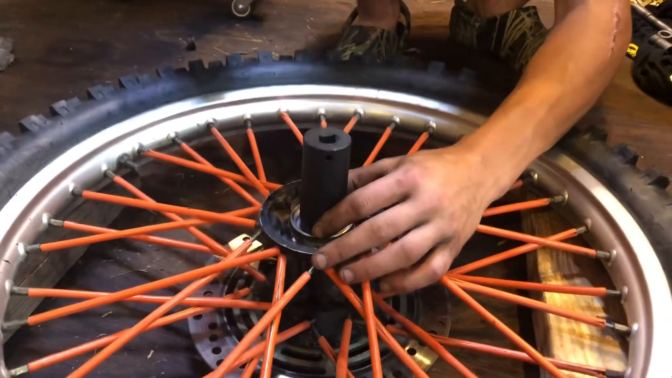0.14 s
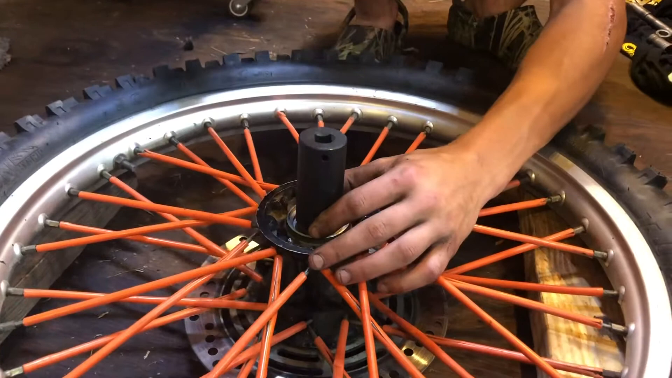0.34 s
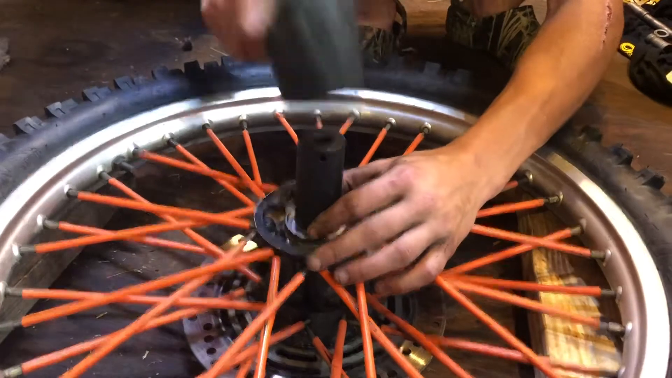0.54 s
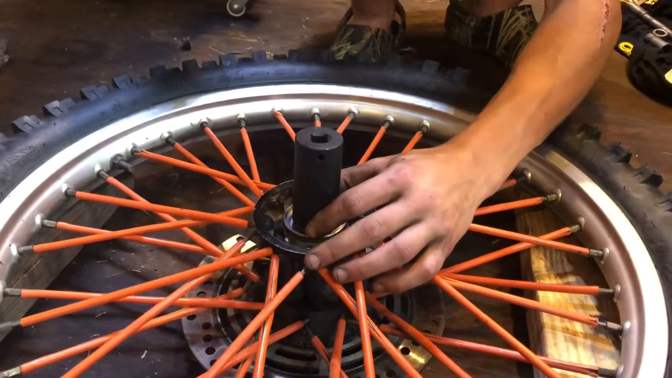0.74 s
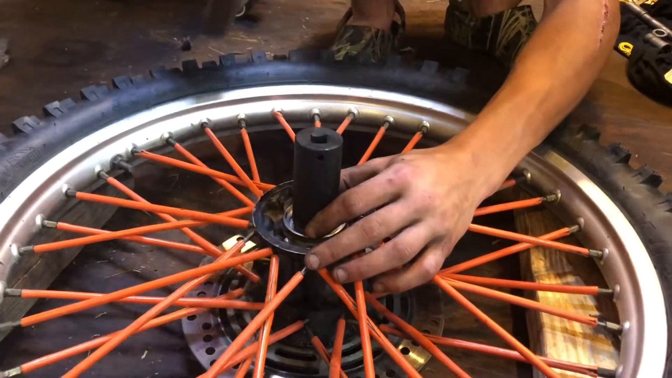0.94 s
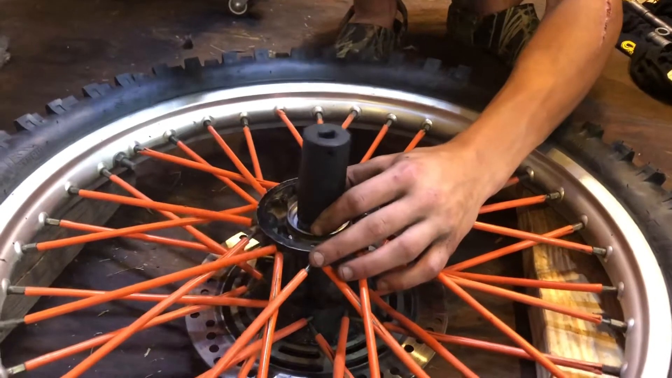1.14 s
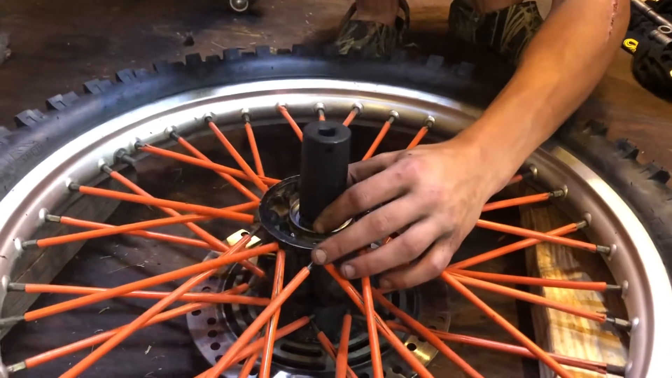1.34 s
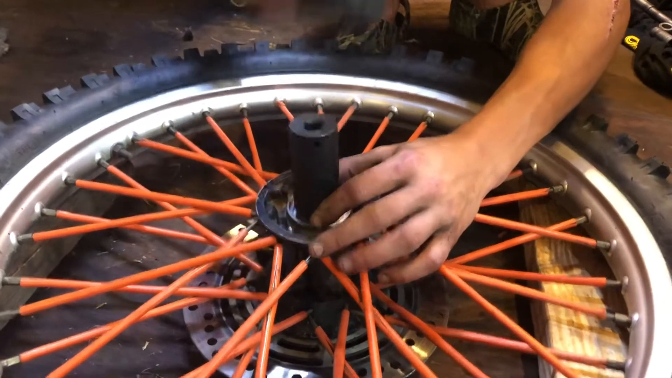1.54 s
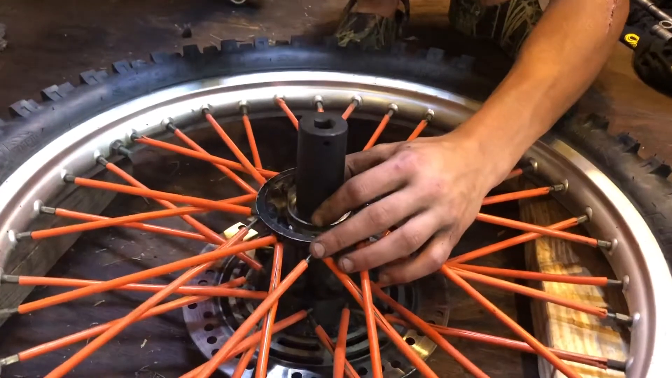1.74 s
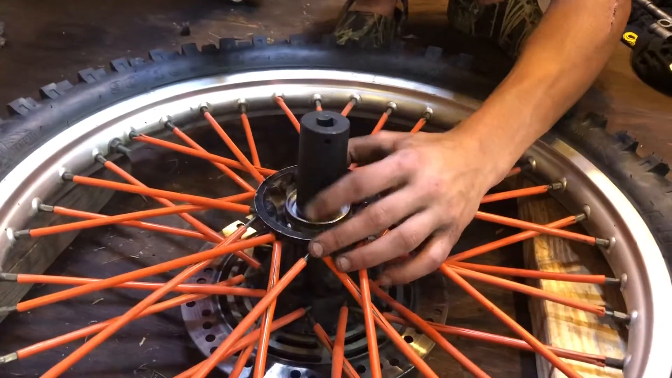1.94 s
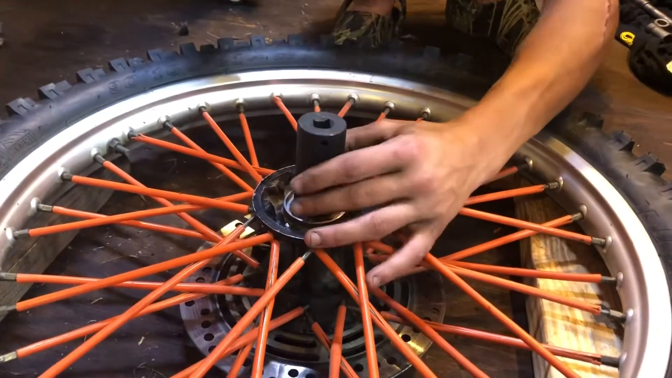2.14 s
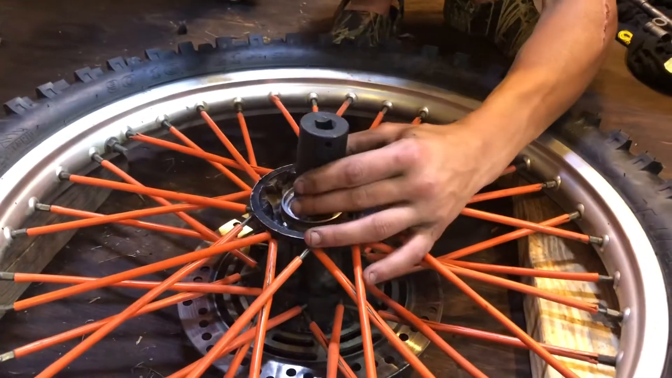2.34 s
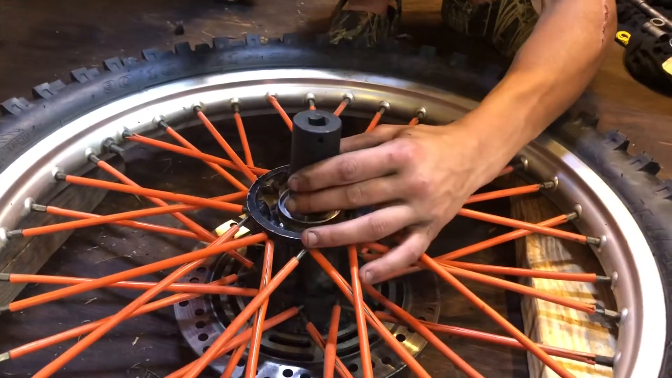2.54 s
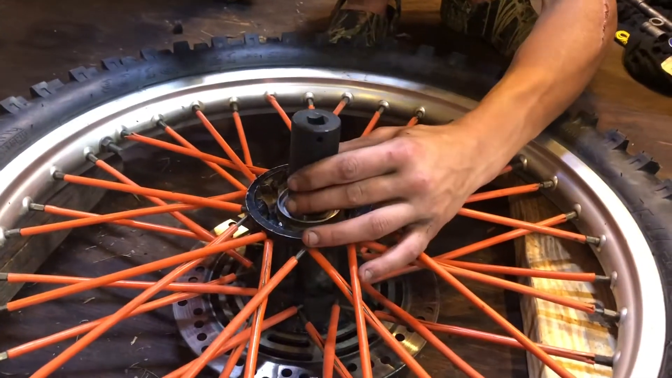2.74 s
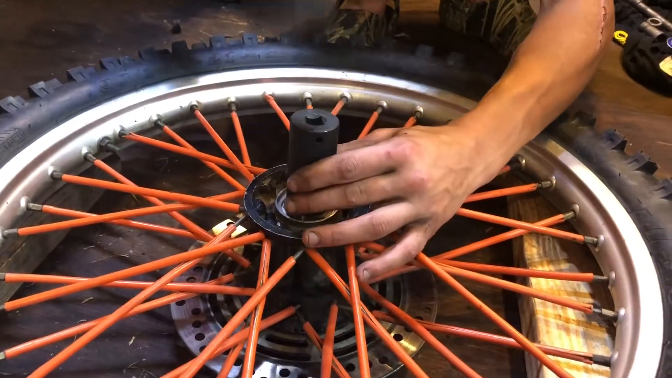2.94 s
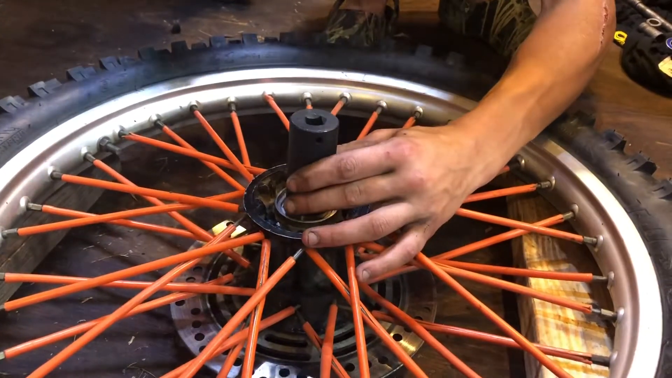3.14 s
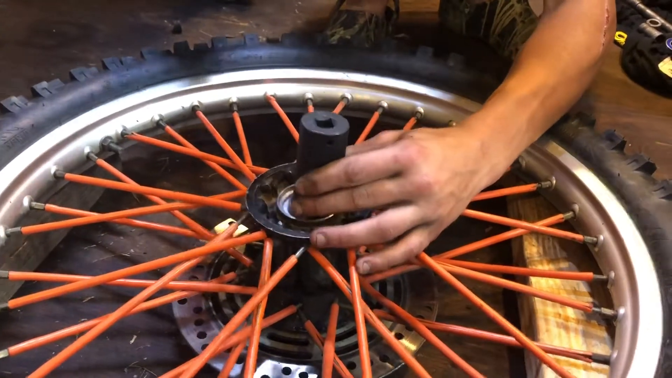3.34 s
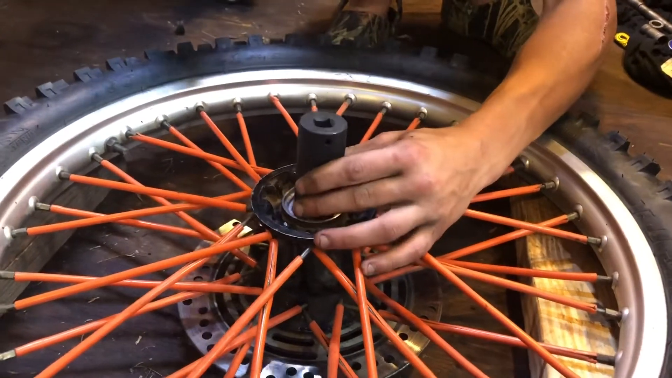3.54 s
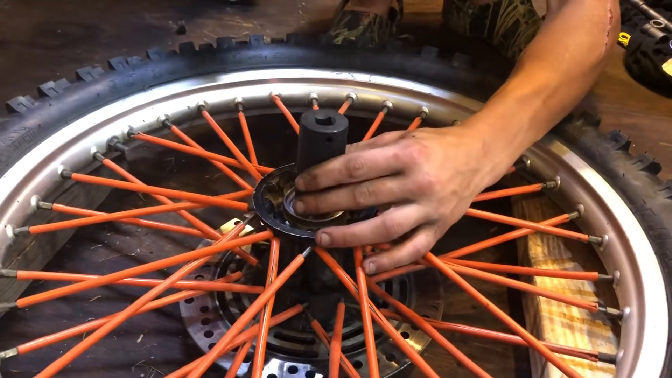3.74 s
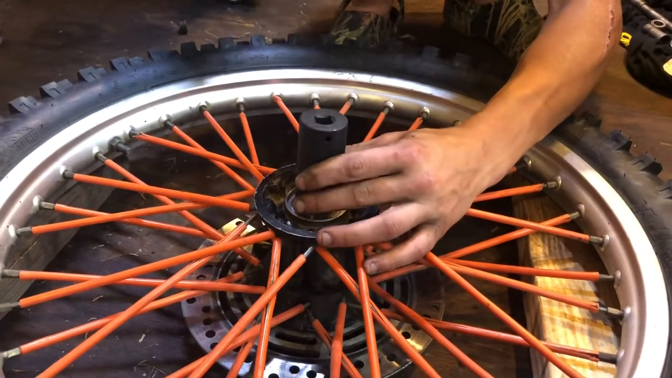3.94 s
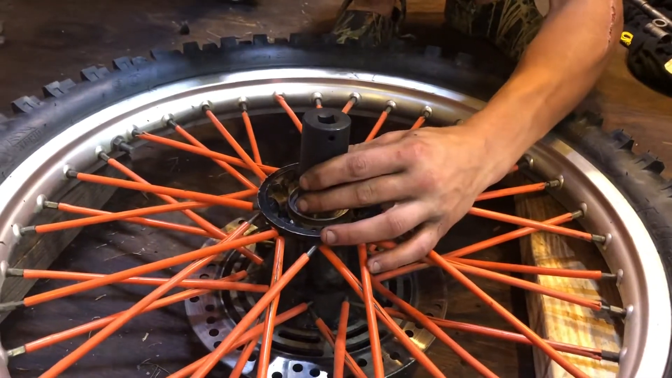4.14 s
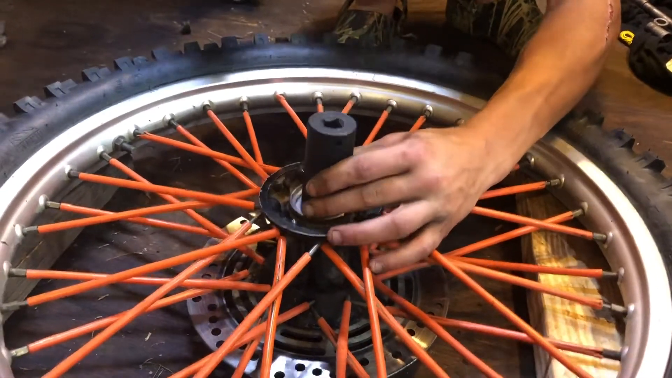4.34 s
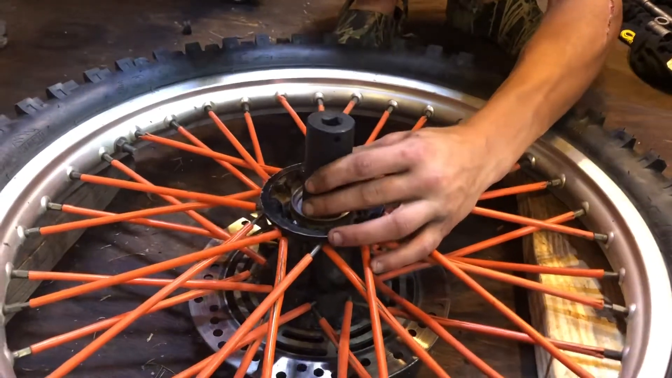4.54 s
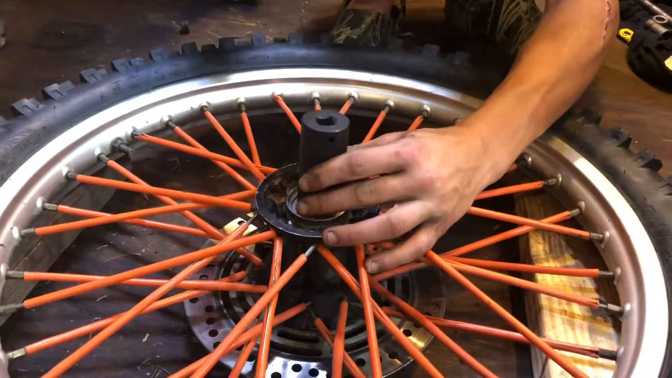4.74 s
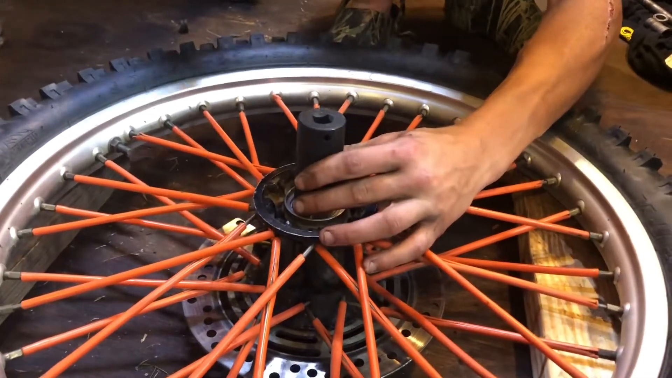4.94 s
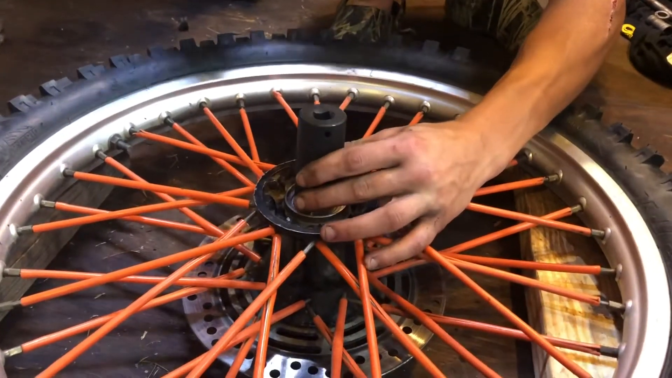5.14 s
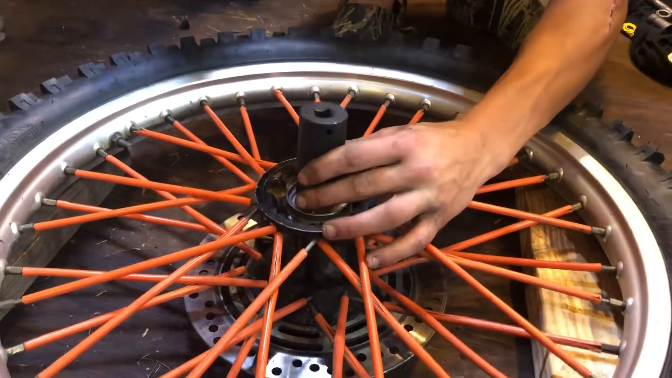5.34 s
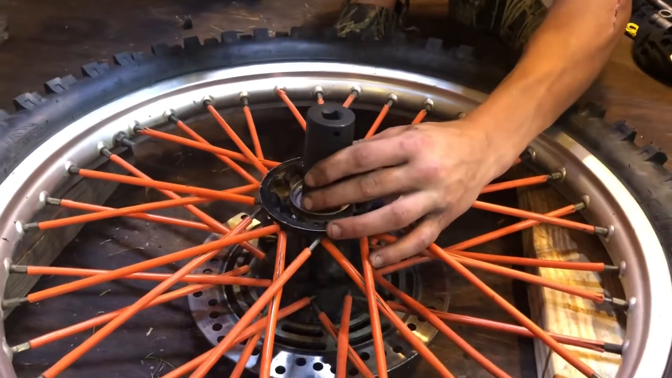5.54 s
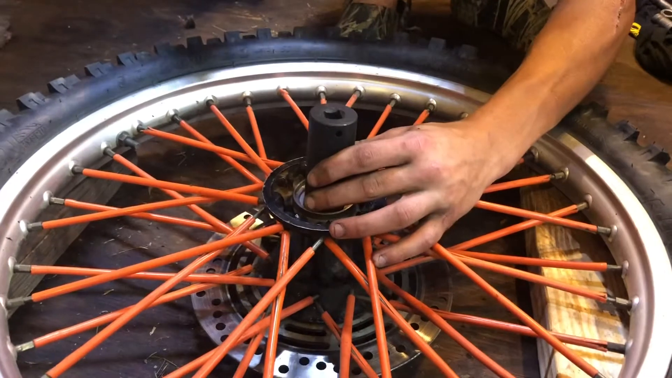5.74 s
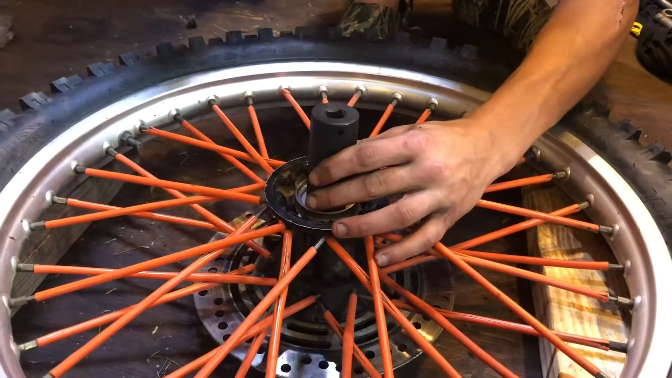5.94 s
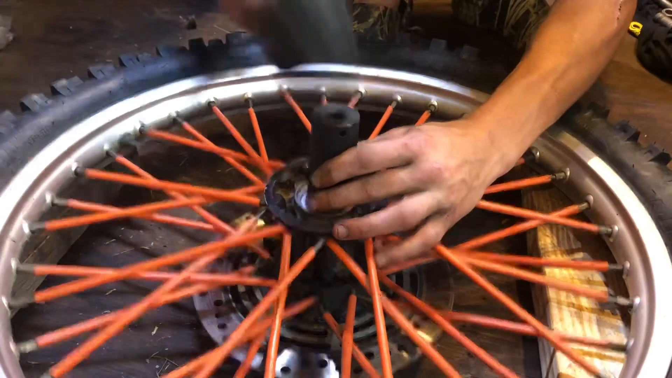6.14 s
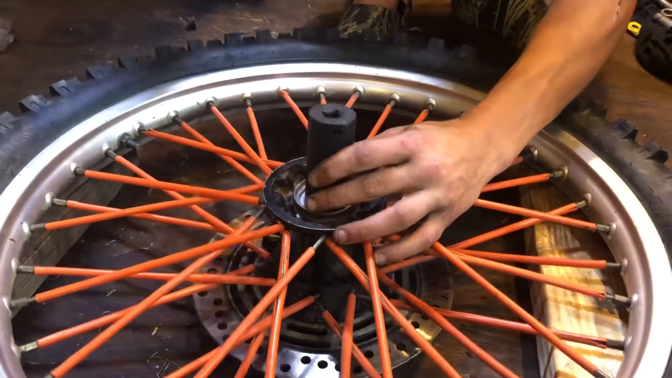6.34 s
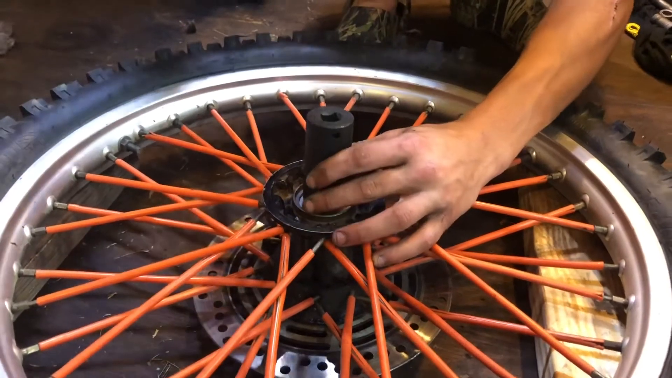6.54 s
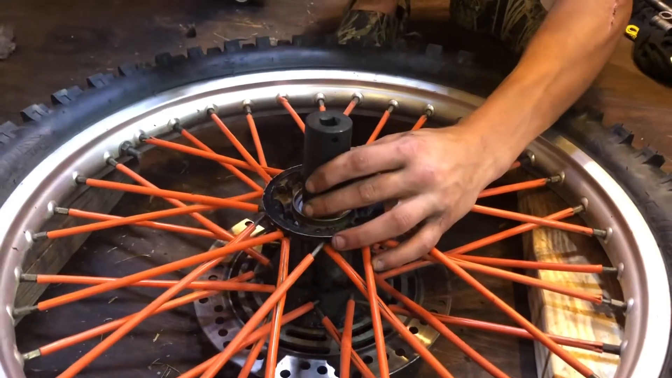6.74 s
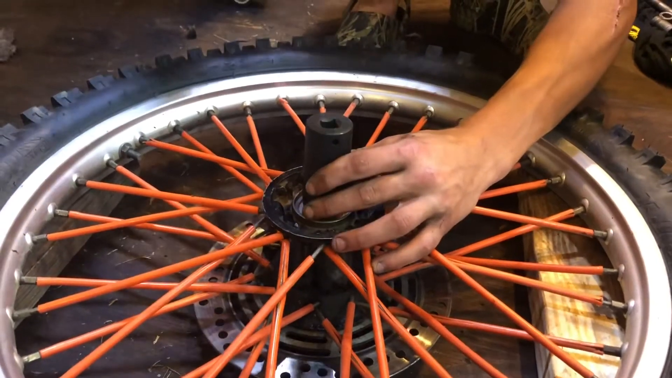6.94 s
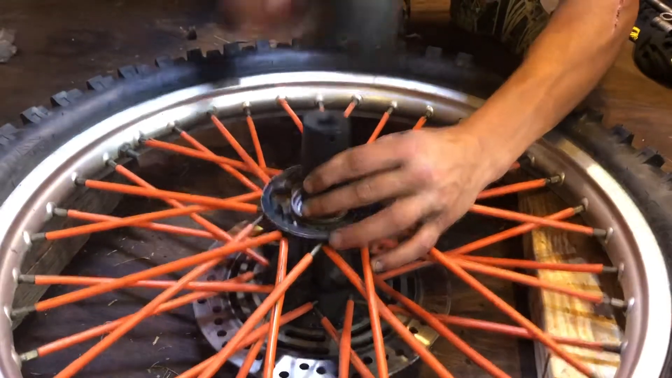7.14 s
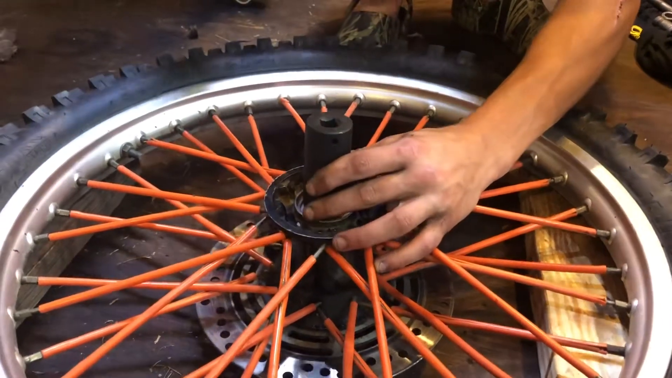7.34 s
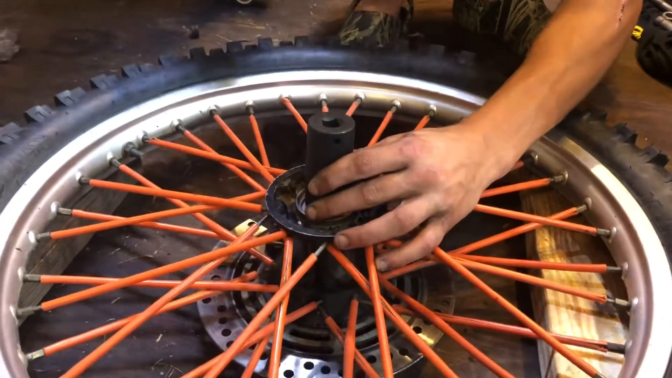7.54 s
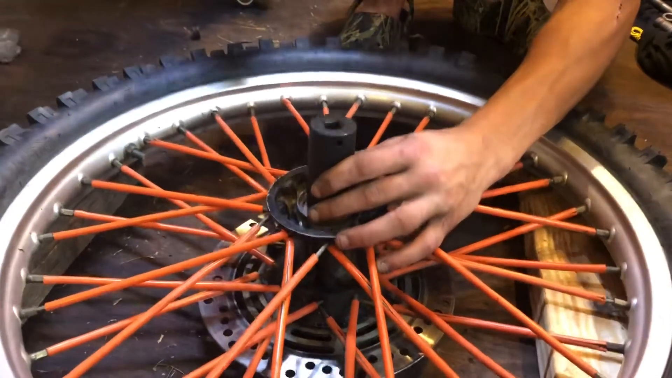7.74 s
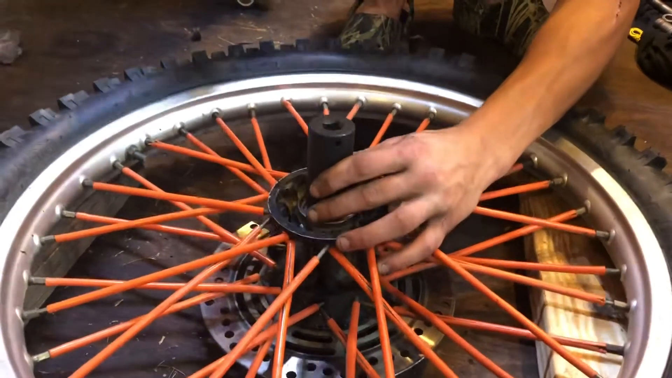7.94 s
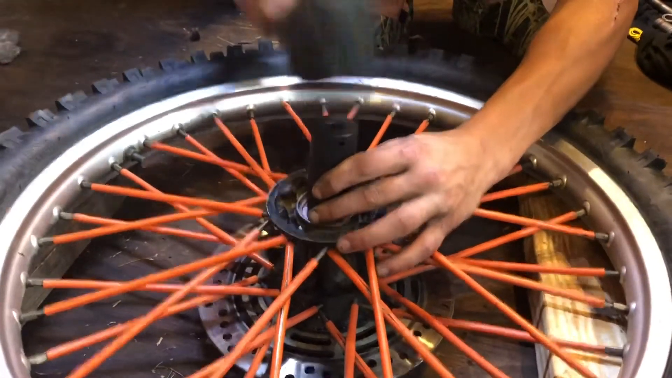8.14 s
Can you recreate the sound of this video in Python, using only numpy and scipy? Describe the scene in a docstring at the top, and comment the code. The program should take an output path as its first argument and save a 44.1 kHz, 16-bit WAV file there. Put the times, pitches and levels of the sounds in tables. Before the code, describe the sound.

Heard close up in a small workshop, a mallet hits a steel socket seated in a wheel hub twelve times. Each loud crack rings briefly through hub and spokes, while the socket chatters and the wheel thumps on wooden blocks. The blows start brisk, pause for soft finger scuffs, resume about once a second and speed up at the end. A motor hums quietly behind.

```python
"""A mallet drives a bearing into the hub of a spoked wheel through a steel socket, in a small workshop.
Each impact cracks, sets hub, spokes and socket into free vibration and bounces the wheel on its
wooden blocks; the socket then chatters in its seat in a run of weakening collisions.
Fingers reset the socket between blows, and a motor hums in the background.
The walls add a short reverberation, and a limiter flattens the loud blows."""
import sys
import numpy as np
from scipy import signal
from scipy.fft import rfft, irfft
from scipy.io import wavfile
from scipy.ndimage import uniform_filter1d, minimum_filter1d

SR = 44100
rng = np.random.default_rng(int(sys.argv[2]) if len(sys.argv) > 2 else 0)


def bounce(signal):
    """Save signal as a 16-bit WAV file at the path given by the first command-line argument."""
    frames = np.transpose(np.atleast_2d(signal))
    limited = np.clip(frames, -1, 1)
    pcm = np.round(limited * 32767).astype(np.int16)
    wavfile.write(sys.argv[1], SR, pcm)


N = 365148

# mallet blows: (time [s], force [dB], hub frequency [Hz], tilt [dB/octave], chatter length [s], then as
# offsets to the force: bite [dB], thump [dB], hub [dB], socket [dB], ping [dB], chatter [dB],
# landing [dB])
BLOWS = [(0.0426, 14, 333.3, -4, 0.13, -20.5, 6, 6, 6.5, -13, -3.5, -28),
         (0.521, 13, 334.3, -2, 0.12, -10, 3, 3, 2.5, -6, -3, -26.5),
         (0.9724, 14, 340, -3, 0.11, -9, 2.5, 3.5, 1.5, -11, -4, -29),
         (1.4784, 9, 341, -3.5, 0.075, -25.5, 8.5, 9, 4, -3.5, 3.5, -22),
         (2.8425, -34.5, 325, -9, .01, -7.5, 22.5, 28.5, -21, -25, -24, -32),
         (3.2513, 14, 330.4, -2.5, 0.06, -8.5, 1, -3.5, 2.5, -6, -2.5, -25),
         (4.2281, 11.5, 336.5, 0.5, 0.09, -15, 0.5, -2, 2, 4.5, -0.5, -22.5),
         (5.1991, 10.5, 317, -0.5, 0.085, 1, 1.5, -6.5, 3.5, 1, -1.5, -26.5),
         (6.1238, 9, 338, -1, 0.11, 0.5, 4, 1, -22, 5.5, -3.5, -19),
         (7.1065, 13, 341, -1.5, 0.12, -2.5, 0.5, -1, -1.5, -2.5, -7, -29),
         (7.64, 14, 327.8, -3, 0.099, -8.5, -2, -7.5, -4.5, -3, -7.5, -22.5),
         (8.128, 9.5, 335, -2, 0.087, -11.5, 1.5, -6, 5.5, -11, -0.5, -24.5)]
# further, more distinct clacks of the socket hopping in its seat: (time [s], level [dB], tilt [dB/octave])
REBOUNDS = [(0.0691, -22, -2), (0.0923, 2.5, 0.5), (0.1101, -4, -3), (0.1186, -4, 11), (0.5853, -3, 3),
            (1.0456, -22, 2), (1.0967, -10, -3), (1.1457, -15.5, -3), (1.5454, -2, 3), (1.6016, -7, -3),
            (1.6572, -14.5, -4), (2.8475, -19, -2.5), (3.289, 4, 2.5), (3.3091, -0.5, -2.5),
            (7.1733, 0.5, 4), (7.7211, -3, 4)]
# fingers nudging the socket: (time [s], level [dB], tilt [dB/octave], t60 [s])
NUDGES = [(1.8794, -21.5, 11.5, 0.021), (2.113, -39, 14.5, 0.097), (2.126, -32, 1, 0.059),
          (2.197, -52, 32, 0.2), (2.255, -40, -4, 0.12), (2.394, -31, 9.5, 0.042), (3.751, -35, 0, 0.054),
          (5.48, -37, 10.5, 0.022), (6.318, -33, 14, 0.062), (6.34, -33, 1, 0.031),
          (6.426, -48, 20.5, 0.14), (6.4986, -23.5, 13, 0.019), (6.533, -44.5, 12, 0.059)]

# normal modes: (frequency [Hz], relative level [dB], t60 [s])
WHEEL_MODES = [(408, -7, .2), (645, -6, .22), (672, -1, .16), (722, -8, .18), (825, -8, .22),
               (882, -5, .22), (947, -5, .18), (1018, -5, .18), (1152, -10, .22), (1291, -3, .22),
               (1324, -2, .22), (1399, -7, .2), (1437, -6, .24), (1658, -8, .18), (1822, -7, .15),
               (2125, -4, .14), (2196, -4, .16), (2260, -2, .18)]  # hub, brake disc and spokes
SOCKET_MODES = [(1590, -17, .4), (2890, -9, .43), (3208, -12, .17), (3795, -12, .18), (4495, -10, .18),
                (4527, -9, .21), (4650, -11, .17), (5755, -13, .29), (6855, -11, .26), (8064, -17, .2),
                (9340, -14, .2), (10770, -17, .32), (12260, -9, .22)]  # steel socket
RACE_MODES = [(10248, -14, 0.22), (10220, 0, 0.084)]  # thin ping of the bearing race
BOUNCE_MODES = [(41.3, 1.5, 0.54), (67.6, -0.5, .4), (107.7, -6, 0.6), (158.9, -6.5, 0.41)]  # wheel on its tyre and blocks

# spectral envelopes: (frequency [Hz], relative level [dB])
CRACK_SPECTRUM = [(120, -17), (250, -4.5), (340, 5), (500, -11.5), (660, -1), (1300, -1), (1550, -1.5),
                  (2200, -6.5), (2480, -29.5), (3000, -28), (4600, -4.5), (5700, -14.5), (9000, -15),
                  (15500, -15)]  # mallet on socket
BITE_SPECTRUM = [(500, -50), (2200, -16), (2700, 0), (3200, 0), (3800, -7), (5000, -24), (15000, -50)]  # steel on steel
THUMP_SPECTRUM = [(20, -17), (45, -0.5), (90, -3), (160, -7), (280, -7), (400, -16), (520, -22),
                  (2000, -49)]  # wheel sinking onto its blocks
CLACK_SPECTRUM = [(200, -18), (500, -15), (680, -1), (1300, 2), (1550, -3), (2200, 2), (2500, -5),
                  (3000, -3), (3700, -6), (4700, -3), (5800, -19), (8000, -25), (15500, -29)]  # socket hopping in its seat
KNOCK_SPECTRUM = [(40, -11), (120, 13.5), (260, 14.5), (400, -10), (510, 6), (680, 3.5), (950, -7),
                  (1300, 10.5), (1550, -13.5), (2200, 7.5), (2500, -17.5), (4600, -44.5), (6500, -35.5),
                  (15000, -58.5)]  # wheel landing
SCUFF_SPECTRUM = [(200, -24.5), (500, -11), (700, 5), (950, 15.5), (1500, -6), (2200, -19), (2800, -29),
                  (5000, -54), (8000, -61), (15000, -58)]  # fingers moving the socket
AIR_SPECTRUM = [(20, -31.5), (38, -9.5), (55, 7.5), (130, -5), (250, -12), (700, -14.5), (1200, -19.5),
                (2500, -29.5), (5000, -37), (9000, -47.5), (15000, -52)]  # room air

# reverberation time of the workshop: (frequency [Hz], t60 [s])
ROOM_T60 = [(60, 0.83), (200, 0.25), (500, 0.29), (1500, 0.23), (4000, 0.18), (8000, 0.24), (15000, 0.15)]
# partials of the motor hum: (frequency [Hz], level [dB])
HUM_PARTIALS = [(59.2, -46.5), (86.1, -54.5), (118.4, -53), (172.3, -53.5), (629.8, -59.5), (689.1, -77),
                (834.4, -67.5)]
# slow changes in the level of hum and air: (time [s], gain [dB])
BACKGROUND_GAIN = [(0, 6), (2, 4.5), (3.9, 5), (4.7, 1), (5.1, 3.5), (5.6, -2), (6.7, -1), (7.05, 2),
                   (7.5, 0), (8.28, 2.5)]


def mallet_blows(wheel_db=-26, socket_db=-27, ping_db=-24, hub_db=-13, hub_t60=0.25, hub_rise_s=0.006):
    """Impact excitation: each blow gives a brief crack, then the struck parts ring in their modes."""
    cracks, rings = np.zeros((2, N))
    wheel, socket, race = mode_bank(WHEEL_MODES), mode_bank(SOCKET_MODES), mode_bank(RACE_MODES)
    socket_hz = np.transpose(SOCKET_MODES)[0]
    socket_ring = amp(-np.log2(socket_hz / 2900)) @ socket  # the soft mallet head: -1 dB per octave
    swell = 1 - np.exp(-(np.arange(SR) / SR / hub_rise_s) ** 2)  # the heavy hub is slow to get moving
    for onset, force_db, hub_hz, tilt_db, _, *offsets_db in BLOWS:
        bite_gain, thump_gain, hub_gain, socket_gain, ping_gain, _, _ = amp(offsets_db)
        crack = contact_burst(CRACK_SPECTRUM, t60=0.022, tilt_db=tilt_db)
        bite = contact_burst(BITE_SPECTRUM, t60=0.011, contact_s=0.0012)  # strong in a square blow
        add(cracks, onset, amp(force_db) * (crack + bite_gain * bite))
        metal = amp(wheel_db) * strike(wheel) + amp(socket_db) * socket_gain * socket_ring
        ping = amp(ping_db) * ping_gain * race.sum(0)
        hub = amp(hub_db) * hub_gain * swell * mode_bank([(hub_hz, 0, hub_t60)])[0]
        add(rings, onset, amp(force_db) * (metal + ping + hub + thump_gain * wheel_thump()))
    return cracks, rings


def wheel_thump(delay_s=0.0071, rise_s=0.0064, t60=0.17, thud_db=-10, bounce_db=-29):
    """A damped mass on a spring: just after the blow the wheel sinks onto its blocks and rocks."""
    t = np.arange(SR) / SR
    swell = 1 - np.exp(-(np.maximum(t - delay_s, 0) / rise_s) ** 2)
    thud = amp(thud_db - 60 * t / t60) * noise(THUMP_SPECTRUM, len(t))
    rocking = amp(bounce_db) * strike(mode_bank(BOUNCE_MODES))
    return swell * (thud + rocking)


def socket_chatter(clack_db=-1, wheel_db=-19, ping_db=-21, socket_db=-38, pressed_t60=1.0):
    """Repeated impact: each hop or rebound of the socket clacks and excites the metal's modes anew."""
    clacks, rings = np.zeros((2, N))
    damping = amp(-60 * np.arange(SR) / SR / pressed_t60)  # the hand presses the socket back down
    wheel, race = mode_bank(WHEEL_MODES) * damping, mode_bank(RACE_MODES) * damping
    socket = mode_bank(SOCKET_MODES)
    for onset, db, tilt_db in REBOUNDS + socket_hops():
        clack = contact_burst(CLACK_SPECTRUM, t60=0.011, tilt_db=tilt_db, contact_s=0.0011)
        add(clacks, onset, amp(db + clack_db) * clack)
        # a soft contact reaches only the low modes, a hard one the high ones too
        steel = amp(ping_db) * strike(race) + amp(socket_db) * strike(socket)
        high_ring = amp(2 * min(tilt_db, 0)) * steel
        low_ring = amp(wheel_db - 2 * tilt_db) * strike(wheel)
        add(rings, onset, amp(db) * (low_ring + high_ring))
    return clacks, rings


def socket_hops(count=8, first_hop_s=0.0076, slowing=1.36, fade_db=22.5, seating_db_per_s=2996):
    """Inelastic collisions, ever weaker and duller: rows of (time [s], level [dB], tilt [dB/octave])."""
    rows, hop = [], 1 + np.arange(count)
    for onset, force_db, _, _, length_s, *_, chatter_db, _ in BLOWS:
        jitter = (hop > 1) * 0.3 * rng.uniform(-1, 1, count)
        delay = first_hop_s * (hop + jitter) ** slowing
        progress = np.maximum(delay - first_hop_s, 0) / length_s
        loss_db = fade_db * progress ** 0.56  # steepest over the first hops
        seating_db = seating_db_per_s * np.maximum(delay - length_s, 0)  # once seated, the hops stop
        scatter_db = 0.5 * rng.standard_normal(count)
        db = force_db + chatter_db - loss_db - seating_db + scatter_db
        tilt_db = 1.5 - 4 * np.minimum(progress, 1)
        rows += zip(onset + delay, db, tilt_db)
    return rows


def wheel_landings(delay_s=0.075, t60=0.1):
    """A damped impact: the wheel drops back onto its blocks with a dull knock after each blow."""
    knocks = np.zeros(N)
    for onset, force_db, *_, landing_db in BLOWS:
        add(knocks, onset + delay_s, amp(force_db + landing_db) * contact_burst(KNOCK_SPECTRUM, t60))
    return knocks


def finger_nudges(wheel_db=-25):
    """Weak contact excitation: centring the socket ticks, scuffs and faintly rings the wheel."""
    scuffs, wheel = np.zeros(N), mode_bank(WHEEL_MODES)
    for onset, db, tilt_db, t60 in NUDGES:
        add(scuffs, onset, amp(db) * contact_burst(SCUFF_SPECTRUM, t60, tilt_db))
        add(scuffs, onset, amp(db + wheel_db) * strike(wheel))
    return scuffs


def workshop_reverberation(x, count=5):
    """Diffuse reverberation: random tails cross-fade, so no fixed pitches ring on from blow to blow."""
    turn = 2 * np.arange(N) / SR  # the next tail every half second
    shares = (np.maximum(1 - abs((turn - k) % count - 1), 0) for k in range(count))
    return sum(signal.fftconvolve(x * np.sqrt(share), room_response())[:N] for share in shares)


def room_response(gap_s=0.0028, late_db=-42, late_t60=0.55):
    """A diffuse field: dense reflections die faster in the treble and leave a faint, dull tail."""
    hz, t, spectrum = signal.stft(rng.standard_normal(SR), SR, nperseg=256)
    early = amp(-60 * t / read_curve(ROOM_T60, hz)[:, None])
    late = amp(late_db - 60 * t / late_t60) / (1 + (hz[:, None] / 2000) ** 2)
    tail = signal.istft(spectrum * (early + late), SR, nperseg=256)[1]
    tail *= np.arange(len(tail)) > gap_s * SR
    return tail / np.linalg.norm(tail)


def motor_and_air(air_db=-44, waver=0.14):
    """Random modulation: a motor's partials waver in amplitude and phase over broadband room air."""
    t = np.arange(N) / SR
    knots = np.linspace(0, t[-1], num=60)
    hum = np.zeros(N)
    for hz, db in HUM_PARTIALS:
        sway, drift = (np.interp(t, knots, row) for row in rng.standard_normal((2, len(knots))))
        phase = 2 * np.pi * hz * t + 2 * waver * drift
        hum += np.sqrt(2) * amp(db) * (1 + waver * sway) * np.sin(phase)
    air = amp(air_db) * noise(AIR_SPECTRUM, N)
    return (hum + air) * amp(np.interp(t, *np.transpose(BACKGROUND_GAIN)))


def contact_burst(spectrum, t60, tilt_db=0, contact_s=0.00017):
    """Modal overlap: countless damped modes merge into noise, driven during contact, then decaying."""
    t = np.arange(SR // 3) / SR
    envelope = amp(-60 * np.maximum(t - contact_s, 0) / t60)
    excitation = rng.choice([-1, 1], len(t)) * envelope
    return shape_spectrum(excitation, spectrum, tilt_db, build_cycles=1.3)[:SR // 4]


def mode_bank(modes):
    """Free vibration: one exponentially decaying sine for each mode of a body."""
    t = np.arange(SR) / SR
    return np.array([amp(db - 60 * t / t60) * np.sin(2 * np.pi * hz * t) for hz, db, t60 in modes])


def strike(bank, spread_db=2):
    """Modal superposition: each contact lands differently and so weights the modes anew."""
    signs = rng.choice([-1, 1], len(bank))
    return (signs * amp(spread_db * rng.standard_normal(len(bank)))) @ bank


def noise(spectrum, size):
    """Stationary noise with the given spectral envelope and an rms of 1."""
    return unit_rms(shape_spectrum(rng.standard_normal(size), spectrum))


def shape_spectrum(x, spectrum, tilt_db=0, build_cycles=0):
    """Filtering with group delay: each frequency takes build_cycles to build up, so bass comes late."""
    hz = np.fft.rfftfreq(len(x), 1 / SR)
    octaves = np.log2(np.clip(hz, 700, 5000) / 2000)
    gain = unit_rms(amp(read_curve(spectrum, hz) + tilt_db * octaves))
    phase_lag = 2 * np.pi * build_cycles * np.log(hz + 100)
    return irfft(rfft(x) * gain * np.exp(-1j * phase_lag), len(x))


def read_curve(points, hz):
    """Interpolation of a table on a logarithmic frequency axis."""
    point_hz, values = np.transpose(points)
    return np.interp(np.log(hz + 1), np.log(point_hz + 1), values)


def amp(db):
    """Amplitude ratio of a level in decibels."""
    return 10 ** (np.asarray(db) / 20)


def unit_rms(x):
    """Normalisation to an rms of 1."""
    return x / np.sqrt(np.mean(x ** 2) + 1e-20)


def add(mix, onset, sound):
    """Superposition of a sound on the mix, starting at onset [s]."""
    part = mix[max(round(onset * SR), 0):][:len(sound)]
    part += sound[:len(part)]


def scene(blow_room_db=-6, chatter_room_db=-10, nudge_room_db=-5):
    """Superposition of direct sound, reflections and background, heard from just above the wheel."""
    cracks, rings = mallet_blows()
    clacks, chatter_rings = socket_chatter()
    clatter = clacks + wheel_landings()
    fingers = finger_nudges()
    direct = cracks + rings + clatter + chatter_rings + fingers
    to_walls = amp(blow_room_db) * cracks + amp(chatter_room_db) * clatter + amp(nudge_room_db) * fingers
    return (direct + workshop_reverberation(to_walls) + motor_and_air())[None]


def record(dry):
    """Saturation and limiting: soft microphone overload, a look-ahead limiter, then a low-pass filter."""
    overload, ceiling_db, recovery_db_per_s, cutoff_hz = 10.0, -1.0, 265, 15900
    saturated = overload * np.tanh(dry[0] / overload)
    excess_db = np.maximum(20 * np.log10(abs(saturated) + 1e-9) - ceiling_db, 0)
    recovery_db = np.arange(N) * recovery_db_per_s / SR
    held_db = np.maximum.accumulate(excess_db + recovery_db) - recovery_db
    gain_db = uniform_filter1d(minimum_filter1d(-held_db, size=31), size=31)  # falls ahead of each peak
    low_pass = signal.firwin(255, cutoff_hz, window=("kaiser", 8), fs=SR)
    return signal.oaconvolve(saturated * amp(gain_db), low_pass, "same")[None]


dry = scene()
out = record(dry)
bounce(out)
```